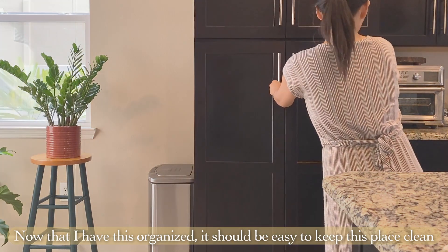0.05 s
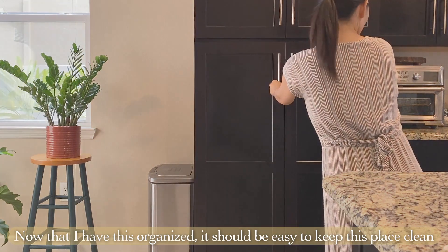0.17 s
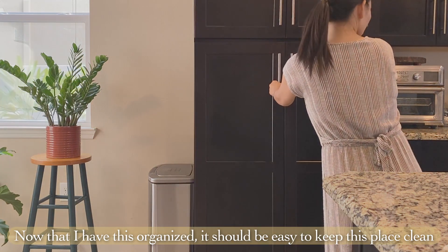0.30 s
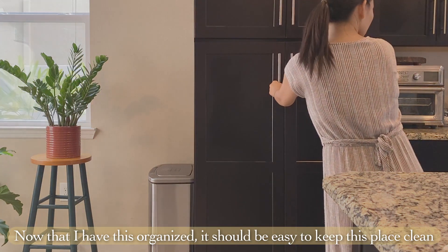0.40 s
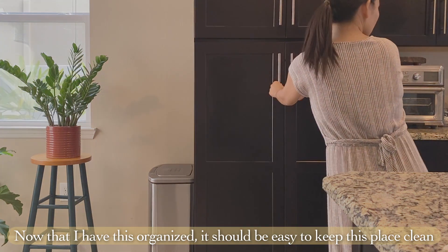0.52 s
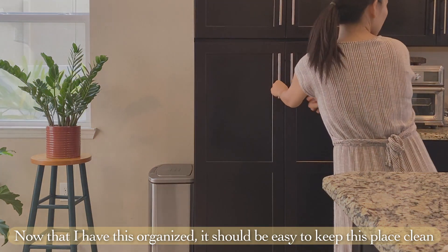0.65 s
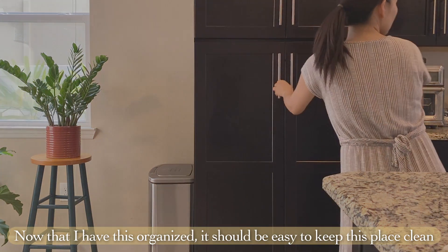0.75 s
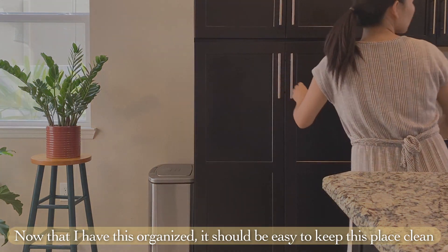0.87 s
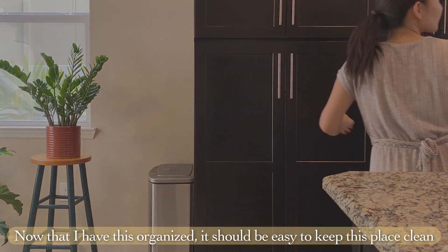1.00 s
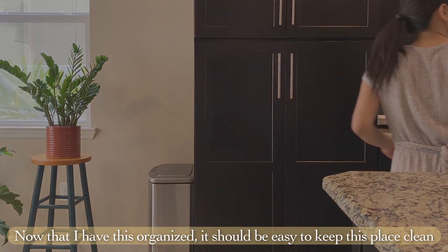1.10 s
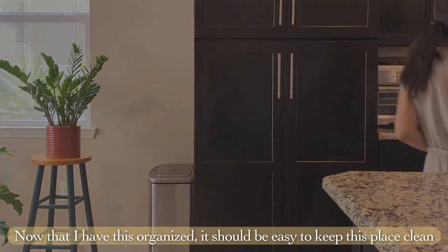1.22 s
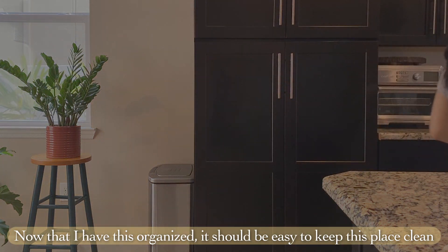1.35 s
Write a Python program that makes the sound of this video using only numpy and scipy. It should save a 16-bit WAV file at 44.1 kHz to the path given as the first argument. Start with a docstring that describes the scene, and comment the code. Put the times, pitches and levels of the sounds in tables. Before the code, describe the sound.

A wooden cabinet door closes with a small catch click and a dull, low thud that rings briefly in the kitchen; a refrigerator hums faintly, and later a slipper scuffs the floor. Stereo microphone in the room.

```python
"""Refrigerator hum, whines and steady room tone, with a faint rustle as a wooden cabinet door swings.
The door shuts: decaying sines for catch, panel and carcass, noise for the catch's crack.
The room answers with noise dying band by band.
Later a slippered foot scuffs the floor: shaped gritty noise, a soft low footfall and small decaying ticks."""
import sys
import numpy as np
from scipy import signal
from scipy.fft import rfft, irfft, next_fast_len
from scipy.io import wavfile
from scipy.ndimage import uniform_filter1d, map_coordinates

SR = 44100
rng = np.random.default_rng(int(sys.argv[2]) if len(sys.argv) > 2 else 0)


def field_ratio(decibels):
    """Amplitude ratio for a level in dB (20 dB per decade); scalars and array-likes work."""
    return 10 ** (np.asarray(decibels, dtype=float) / 20)


def waveform_to_disk(signal):
    """Save audio, clipped to [-1, 1], as 16-bit WAV at the path in sys.argv[1]."""
    frames = np.transpose(np.atleast_2d(signal))
    scaled = np.clip(frames, -1, 1) * 32767
    samples = np.round(scaled).astype(np.int16)
    wavfile.write(sys.argv[1], SR, samples)


N = 61739

HUM_HZ, HUM_DB, HUM_WAVER_DB = 58.8, -44.5, 0.5
# hum level over HUM_DB: time_s, level_db
HUM_SWELL = [(0, -26), (.08, -5), (.5, -5.5), (.85, -5), (1.4, -1.5)]
TONE_DB, PATCHY_DB = -51.5, 2.5
# room tone spectrum, relative: freq_hz, level_db
TONE_COLOUR = [(20, -39), (28, -36), (36, -5), (60, 2), (90, -2), (170, -5), (250, -6.5), (400, -11.5),
               (500, -18.5), (620, -13), (800, -20), (1200, -25.5), (2500, -41.5), (3500, -46.5),
               (5200, -43), (6500, -52.5), (10000, -54), (14000, -61), (15000, -57)]
# room tone left-right likeness, below 0 read as 0: freq_hz, likeness
TONE_ALIKE = [(60, 0.84), (180, 0.87), (550, 0.25), (1650, 0.14), (4970, 0.34), (15000, -0.45)]
# narrow bands in the refrigerator's noise: centre_hz, level_db, half_amplitude_width_hz
WHINES = [(601, -70.5, 4), (631, -70.5, 4.4), (3005, -96.5, 7), (3500, -100, 7.3), (4050, -98, 7.2),
          (4500, -97, 3.7), (5100, -93, 4.4), (5190, -99, 8), (5400, -99, 4.3), (6360, -102, 5)]
# rustle as the door swings: time_s, level_db
SWING = [(0, -89), (.1, -75.5), (.14, -70), (.19, -76.5), (.22, -59.5), (1.4, -120)]
# rustle spectrum, relative: freq_hz, level_db
SWING_COLOUR = [(600, -39), (1200, 6), (1900, 6), (2800, -4.5), (5000, -22), (9000, -48)]

# contacts of the catch: time_s, crack_db, ring_db
CONTACTS = [(.2135, -34, -31), (.2172, -35, -37)]
# catch plate modes, level over ring_db: freq_hz, level_db, t60_s
CATCH_MODES = [(1920, -3.5, 0.029), (2940, -3, 0.02), (3240, -8.5, 0.013), (4830, -12, .012),
               (7060, -7.5, 0.0058)]
# crack spectrum, relative: freq_hz, level_db
CRACK_COLOUR = [(300, 10), (1000, 18), (2000, 1), (3000, 1), (4000, -12), (5000, 11), (6000, -31),
                (7200, -11), (9000, -17), (15000, -42)]
CRACK_T60_S, CRACK_RISE_S = .012, 0.00013
# panel lands, first one corner, then flat: time_s, blow_db
BLOWS = [(.2148, -27), (.22, -21)]
# door panel modes, level over blow_db: freq_hz, level_db, t60_s, rise_s, left_over_right_db
PANEL_MODES = [(100, 2, 0.16, 0.0034, -1.5), (245.5, -4.5, 0.23, 0.0025, 6.5), (391, 1, 0.06, 0.00017, 0.5),
               (566.3, -5.5, 0.08, 0.00077, 6.5), (883, -11, 0.17, .0005, -1),
               (1127, -11, 0.078, 0.0014, -0.5), (1544, -15, 0.043, 0.00029, 1)]
# cabinet modes: freq_hz, level_db, t60_s, rise_s, left_over_right_db
CARCASS_MODES = [(45.76, -40.5, 1.16, 0.067, 1), (129.74, -29.5, 0.61, 0.073, 1.1),
                 (131.57, -27.5, 0.54, 0.064, 0.82), (200.5, -37.5, 0.44, 0.016, 2.2),
                 (264.15, -25.5, 0.36, 0.011, 1.2), (364.3, -29, 0.3, 0.003, 1), (398, -42, 0.32, .01, 1),
                 (405.2, -35.5, 0.56, 0.016, 2), (441.6, -36.5, 0.48, 0.019, 2),
                 (536, -34.5, 0.4, 0.0029, 2.2)]

# thud sent into the room, relative: freq_hz, level_db
THUD_COLOUR = [(35, -54), (60, -12.5), (160, -10), (300, -16.5), (420, -7), (620, -14.5), (800, -17.5),
               (1500, -25.5), (2500, -31), (4180, -35.5), (7000, -47.5), (9000, -48.5), (11000, -58.5),
               (13400, -56), (15800, -68)]
# room decay: freq_hz, t60_s
ROOM_T60 = [(100, 0.91), (500, 0.69), (2000, 0.8), (6000, 0.67), (12000, 0.34)]
# room answer left-right likeness: freq_hz, likeness
ROOM_ALIKE = [(60, 0.77), (180, 1), (550, 0.17), (1650, 0.12), (4970, 0.41), (15000, 0.01)]
ROOM_DB, ROOM_RISE_S = -33, 0.0085
EARLY_DB, EARLY_T60_S = 6.5, 0.2  # faster first part, over the answer

# slipper dragging, level before SCUFF_DB is added: time_s, level_db
SCUFF = [(1.06, -100), (1.07, -105), (1.11, -74.5), (1.158, -82), (1.246, -76), (1.262, -75), (1.27, -79),
         (1.276, -68), (1.31, -73.5), (1.39, -85.5)]
# drag spectrum, relative: freq_hz, level_db
SCUFF_COLOUR = [(800, 1), (2000, 5.5), (4500, 1), (7000, 0), (11000, -0.5), (15500, 2)]
SCUFF_DB, GRIT_PER_S = 6, 730
# lower brush of the sole: time_s, level_db
BRUSH = [(1.18, -91), (1.193, -70), (1.215, -73), (1.24, -73), (1.26, -95)]
# brush spectrum, relative: freq_hz, level_db
BRUSH_COLOUR = [(700, -26), (1300, -2), (2000, 12), (2700, -13), (4000, -25)]
# soft footfall: time_s, level_db, freq_hz, t60_s
STEPS = [(1.113, -43, 100, 0.04)]
# small ticks under the slipper: time_s, level_db, freq_hz
TICKS = [(1.111, -56, 9000), (1.193, -62, 2000), (1.197, -62, 2000), (1.2613, -46, 12000),
         (1.2755, -56, 5000), (1.2784, -41, 12000)]
TICK_T60_AT_6KHZ_S, TICK_ROOM_DB = .002, -6

# microphone pair balance: freq_hz, left_over_right_db
LEFT_OVER_RIGHT = [(60, 0), (180, 2.0), (550, 0.0), (1650, 1.5), (4970, 4.5), (15000, -3.5)]
LOW_CUT_HZ, TOP_HZ = 23.4, 15850
TREBLE_HZ, TREBLE_LEAD_S, TREBLE_SHARE = 6300, 1 / 4480, .96


def unit(x):
    """Scale to rms 1."""
    return x / np.sqrt(np.mean(x ** 2) + 1e-20)


def along(points, hz):
    """Read (Hz, value) points on a log frequency axis."""
    f, v = np.transpose(points)
    return np.interp(np.log(hz + 1), np.log(f + 1), v)


def curve(rows):
    """(s, dB) rows as gain per sample, -150 dB outside."""
    s, level_db = np.transpose(rows)
    return field_ratio(np.interp(np.arange(N) / SR, s, level_db, left=-150, right=-150))


def since(s):
    """Seconds after a moment, zero before."""
    return np.maximum(np.arange(N) / SR - s, 0)


def noise():
    """Two unrelated white noises."""
    return rng.standard_normal((2, N))


def filtered(x, response):
    """x times a complex response of frequency."""
    m = next_fast_len(N + 8192)
    return irfft(rfft(x, m) * response(np.fft.rfftfreq(m, 1 / SR)), m)[..., :N]


def paired(pair, colour, alike):
    """Two unrelated signals coloured and mixed to a left-right likeness."""
    def mid_side_gain(hz):
        angle = np.arccos(np.clip(along(alike, hz), 0, 1)) / 2
        return field_ratio(along(colour, hz)) * np.array([np.cos(angle), np.sin(angle)])
    mid, side = filtered(pair, mid_side_gain)
    return np.array([mid + side, mid - side])


def patchy(depth_db, wide=3, long=12):
    """Two noises whose gain varies in narrow, lasting patches (bins wide, frames long)."""
    z = signal.stft(noise(), nperseg=1024)[2]
    field = rng.standard_normal(z.shape[1:])
    field = uniform_filter1d(field, size=wide, axis=0)
    field = uniform_filter1d(field, size=long, axis=1)
    return signal.istft(z * field_ratio(depth_db * unit(field)), nperseg=1024)[1][:, :N]


def banded_decay(pair, t60s, start_s):
    """Each frequency dies at its own speed from start_s on."""
    hz, frame_s, z = signal.stft(pair, SR, nperseg=256)
    late_s = np.maximum(frame_s - start_s, 0)
    return signal.istft(z * field_ratio(-60 * late_s / along(t60s, hz)[:, None]), SR, nperseg=256)[1]


def ringing(modes, s, blow_db):
    """Damped modes that build up after a blow."""
    t = since(s)
    out = np.zeros((2, N))
    for hz, level_db, t60_s, rise_s, pan_db in modes:
        decay = field_ratio(blow_db + level_db - 60 * t / t60_s)
        mode = np.sin(2 * np.pi * hz * t) * decay * (1 - np.exp(-t / rise_s))
        out += mode * field_ratio([[pan_db / 2], [-pan_db / 2]])
    return out


def compressor_hum():
    """A low sine whose level wavers at random."""
    waver = map_coordinates(rng.standard_normal(20), [np.arange(N) * 9 / SR])  # 9 points per s
    sine = np.sqrt(2) * np.sin(2 * np.pi * HUM_HZ * np.arange(N) / SR)
    return sine * field_ratio(HUM_DB + HUM_WAVER_DB * waver) * curve(HUM_SWELL)


def room_tone():
    """Broad steady noise, slightly uneven in time and frequency."""
    return field_ratio(TONE_DB) * unit(paired(patchy(PATCHY_DB), TONE_COLOUR, TONE_ALIKE))


def refrigerator_whines():
    """Noise through narrow resonances."""
    out = np.zeros((2, N))
    for centre_hz, level_db, width_hz in WHINES:
        band = filtered(noise(), lambda hz: 1 / (1 + (2 * (hz - centre_hz) / width_hz) ** 2))
        out += field_ratio(level_db) * unit(band)
    return out


def swing_rustle():
    """Coloured noise follows the swinging door."""
    return unit(paired(noise(), SWING_COLOUR, [(1000, .4)])) * curve(SWING)


def catch():
    """Each contact rings the plate modes and cracks as a short noise burst."""
    out = np.zeros((2, N))
    for s, crack_db, ring_db in CONTACTS:
        t = since(s)
        for hz, level_db, t60_s in CATCH_MODES:
            out += np.sin(2 * np.pi * hz * t) * field_ratio(ring_db + level_db - 60 * t / t60_s)
        grain = unit(paired(noise(), CRACK_COLOUR, [(500, 1.0), (5000, .7)]))
        out += grain * field_ratio(crack_db - 60 * t / CRACK_T60_S) * (1 - np.exp(-t / CRACK_RISE_S))
    return out


def door():
    """Each blow rings the panel; the carcass takes up the motion from the first."""
    panel = sum(ringing(PANEL_MODES, s, blow_db) for s, blow_db in BLOWS)
    return panel + ringing(CARCASS_MODES, BLOWS[0][0], 0)


def kitchen_answer():
    """Diffuse sound of the thud builds up in a few ms and dies band by band."""
    start_s = CONTACTS[0][0]
    t = since(start_s)
    thud = unit(paired(patchy(1.5, long=4), THUD_COLOUR, ROOM_ALIKE))
    tail = banded_decay(thud, ROOM_T60, start_s)[:, :N]
    early = field_ratio(EARLY_DB - 60 * t / EARLY_T60_S)
    return field_ratio(ROOM_DB) * tail * (1 - np.exp(-t / ROOM_RISE_S)) * (1 + early)


def gritty():
    """Noise with random samples boosted, as grit under friction."""
    return noise() * (1 + 3.1 * (rng.random(N) < GRIT_PER_S / SR))


def slipper_scuff():
    """Gritty friction follows the stroke: a bright drag and a lower brush."""
    drag = unit(paired(gritty(), SCUFF_COLOUR, [(2000, 0.21)])) * curve(SCUFF)
    brush = unit(paired(gritty(), BRUSH_COLOUR, [(2000, 0.58)])) * curve(BRUSH)
    return field_ratio(SCUFF_DB) * drag + brush


def footfall():
    """A soft, damped low sine."""
    out = np.zeros((2, N))
    for s, level_db, hz, t60_s in STEPS:
        t = since(s)
        out += np.sin(2 * np.pi * hz * t) * field_ratio(level_db - 60 * t / t60_s)
    return out


def floor_ticks():
    """Damped sines, shorter when higher, each with its own noise room tail."""
    out = np.zeros((2, N))
    for s, level_db, hz in TICKS:
        t = since(s)
        t60_s = TICK_T60_AT_6KHZ_S * 6000 / hz
        click = np.sin(2 * np.pi * hz * t) * field_ratio(level_db - 60 * t / t60_s)
        tail = banded_decay(rng.standard_normal((2, int(0.21 * SR))), ROOM_T60, 0)
        tail /= np.linalg.norm(tail[0])  # left energy 1
        out += click + field_ratio(TICK_ROOM_DB) * signal.fftconvolve(click[None], tail, axes=1)[:, :N]
    return out


def scene():
    """Kitchen background, door, room answer and slipper."""
    background = compressor_hum() + room_tone() + refrigerator_whines() + swing_rustle()
    shutting = catch() + door() + kitchen_answer()
    return background + shutting + slipper_scuff() + footfall() + floor_ticks()


def roll_off(x):
    """The treble ends steeply here."""
    return signal.sosfilt(signal.butter(12, 16180, fs=SR, output="sos"), x)


def record(dry):
    """Pair loses deepest bass, has uneven balance; treble is mostly shared, right inverted and early."""
    def pair_response(hz):
        balance = field_ratio(along(LEFT_OVER_RIGHT, hz) * np.array([[.5], [-.5]]))
        low_cut = (1j * hz / (LOW_CUT_HZ + 1j * hz)) ** 2
        return balance * (hz < TOP_HZ) * low_cut

    def share(hz):
        return TREBLE_SHARE * np.clip((hz - TREBLE_HZ) / 600 + .5, 0, 1)

    left, right = filtered(dry, pair_response)
    own = filtered(right, lambda hz: np.sqrt(1 - share(hz) ** 2))
    shared = filtered(left, lambda hz: share(hz) * np.exp(2j * np.pi * hz * TREBLE_LEAD_S))
    return roll_off(np.array([left, own - shared]))


dry = scene()
out = record(dry)
waveform_to_disk(out)
```